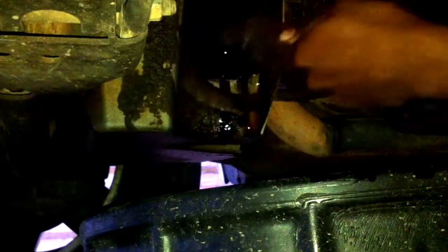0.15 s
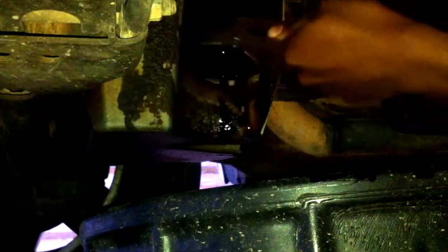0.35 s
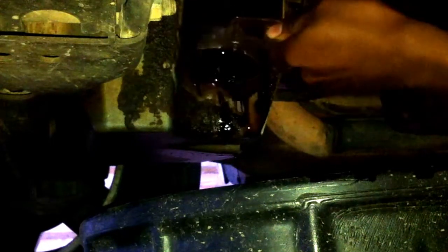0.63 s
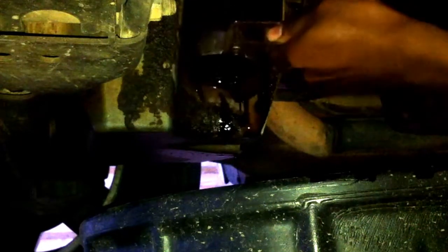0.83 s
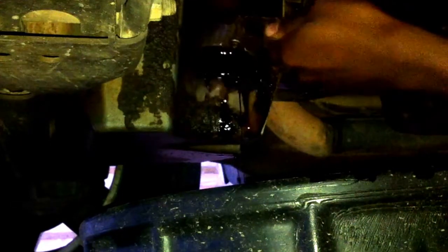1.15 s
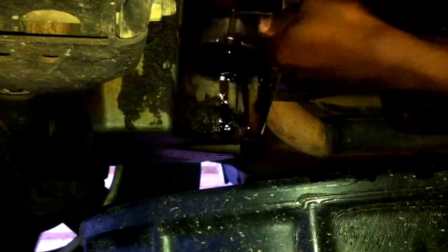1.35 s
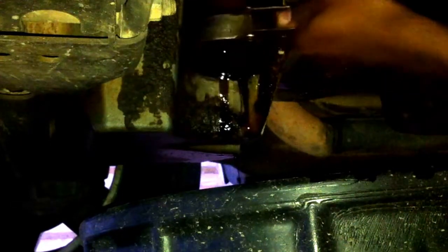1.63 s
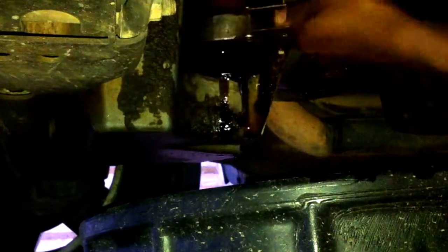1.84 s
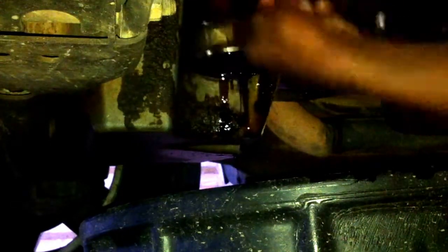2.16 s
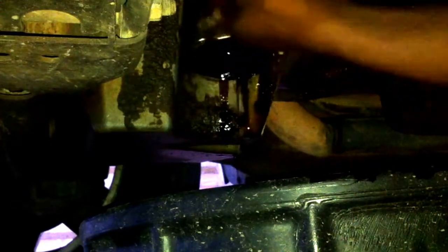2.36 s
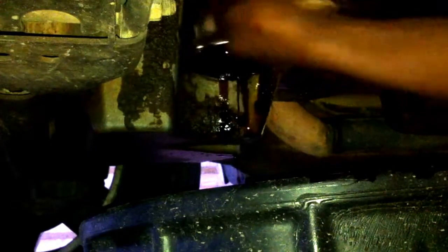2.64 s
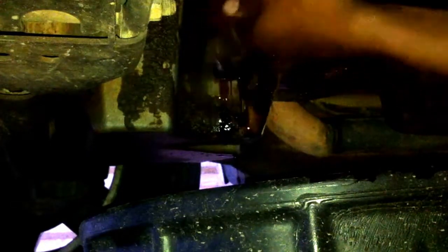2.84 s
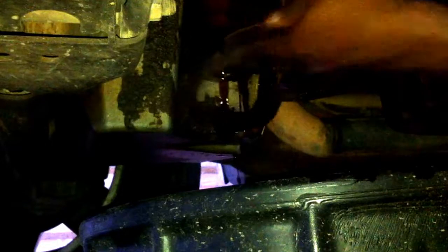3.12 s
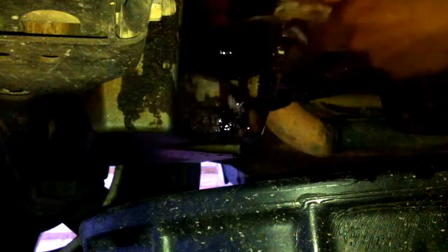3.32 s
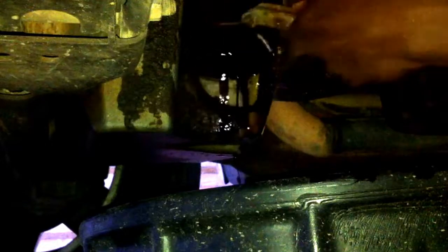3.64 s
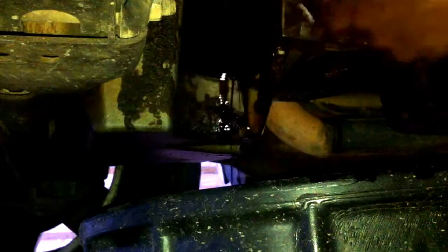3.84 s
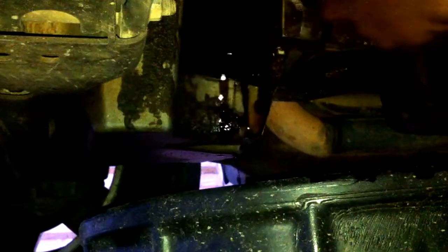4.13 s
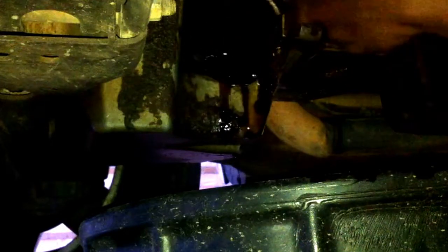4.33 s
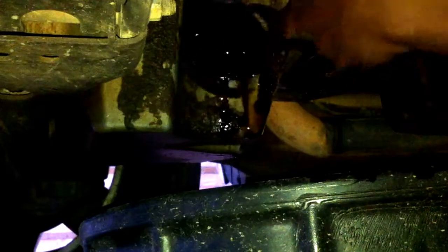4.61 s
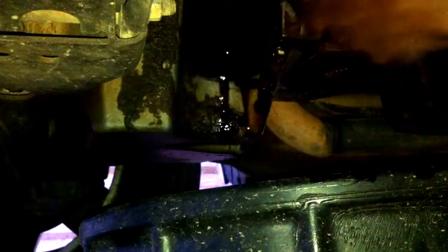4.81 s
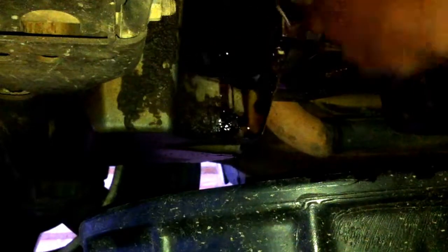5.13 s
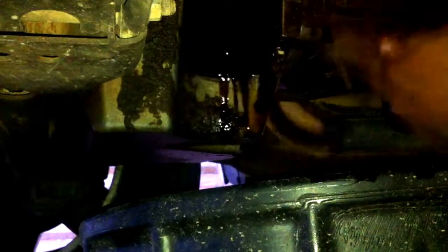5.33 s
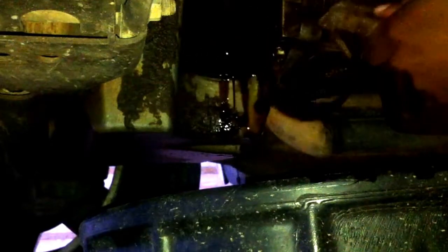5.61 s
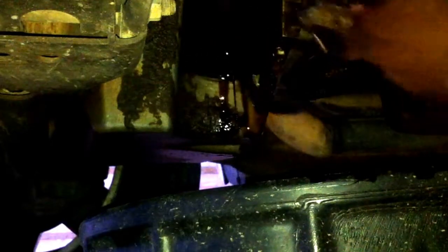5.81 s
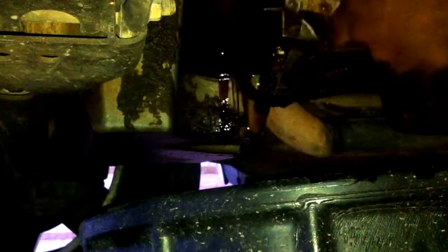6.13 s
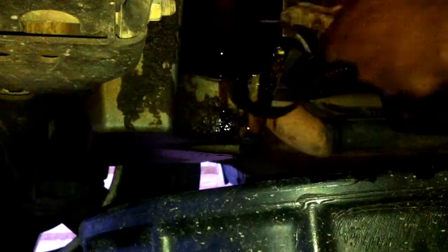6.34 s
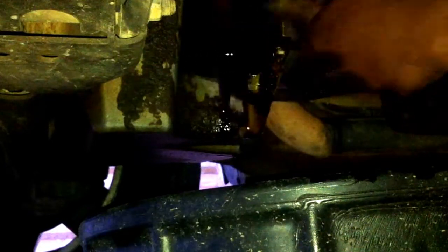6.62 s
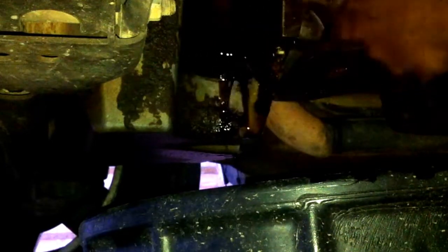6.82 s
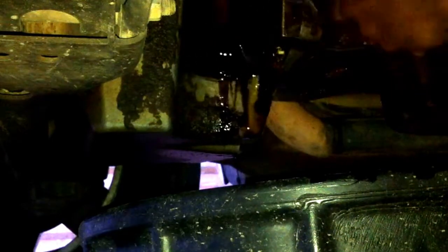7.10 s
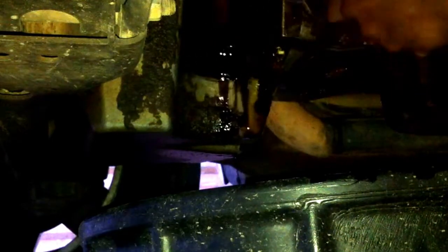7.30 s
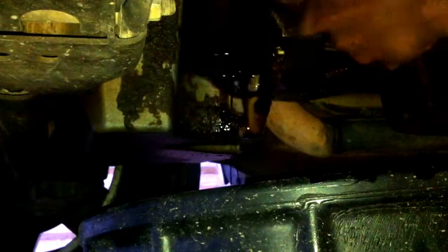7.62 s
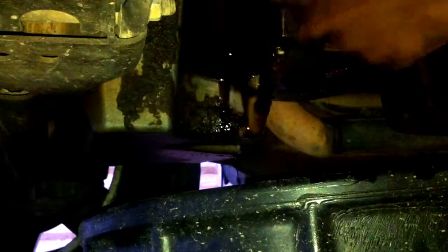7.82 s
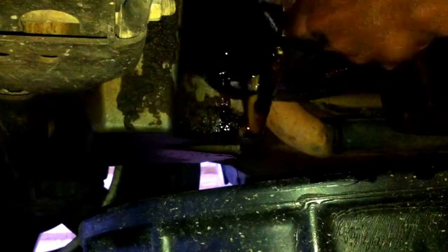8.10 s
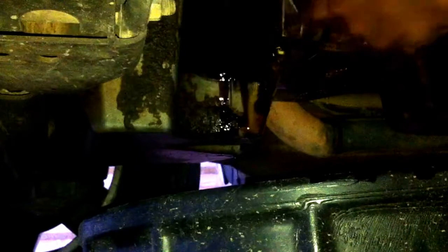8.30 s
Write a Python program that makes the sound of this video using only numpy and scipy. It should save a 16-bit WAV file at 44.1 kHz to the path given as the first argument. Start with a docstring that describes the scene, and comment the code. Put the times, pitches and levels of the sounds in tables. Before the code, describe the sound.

Oil patters and drums softly into a plastic pan while a filter clicks, with one dull bump over faint garage hum.

```python
"""Oil patters and drums softly in a plastic drain pan, over dull garage air and a thin high whine.
It runs off a loosened filter under a car: thick blobs make the pan floor boom, single drips tick on
its wall. A hand works at the filter, which clicks and rings its steel shell, and oily fingers slip.
After five seconds the arm brushes along the car's underside, bumps it once and squeaks faintly."""
import sys
import numpy as np
from scipy import signal
from scipy.fft import rfft, irfft, next_fast_len
from scipy.io import wavfile
from scipy.ndimage import map_coordinates

SR = 44100
rng = np.random.default_rng(int(sys.argv[2]) if len(sys.argv) > 2 else 0)


def unload_audio(sound):
    """Save the sound as a 16-bit wav file, at the path given as the first command line argument."""
    columns = np.transpose(np.atleast_2d(sound))
    # keep every value between -1 and 1, then stretch to whole-number steps
    steps = np.round(np.clip(columns, -1, 1) * 32767)
    wavfile.write(sys.argv[1], SR, steps.astype(np.int16))


N = 373086

# Levels are relative. A mode is a note a thing rings at; t60 is the time it takes to fade by 60 dB.
AIR_SPECTRUM = [(20, -16), (50, -26), (85, -15.5), (125, 2), (180, 5.5), (220, -6), (280, -1.5),
                (400, -5.5), (520, -5), (620, -5), (860, -6.5), (1020, -13), (1700, -17.5), (6000, -22),
                (9500, -21), (15500, -23.5)]  # the garage air: f/Hz, level/dB
AIR_DRIFT = [(0, -61), (.85, -65), (1.6, -64), (2.4, -63.5), (3.1, -65.5), (3.4, -67.5), (3.7, -65.5),
             (5, -64), (6.4, -61), (7.05, -64.5), (7.6, -62.5), (7.8, -72), (8.46, -62.5)]  # rise and fall of the air's dull part: t/s, level/dB
GARAGE_DECAY = [(150, 0.22), (400, .4), (800, 0.41), (2000, 0.12), (5500, 0.12), (12000, 0.048)]  # how long the garage echoes: f/Hz, t60/s
PAN_HUM_MODES = [(175.1, 18.5, -0.5), (557, 53, -28), (744, 8.6, -24), (906, 9.8, -12)]  # the pan under the thin stream: f/Hz, width/Hz, level/dB
# modes of the pan wall, in four groups from body to treble: f/Hz, width/Hz, level/dB
WALL_LOW_MODES = [(490, 173, 0.5), (715.6, 51, 5.5), (867, 60, 6)]
WALL_MID_MODES = [(1040, 200, -2.5), (1294, 265, 0.5), (1510, 100, -9.5)]
WALL_BRIGHT_MODES = [(1560, 320, -5.5), (1960, 94, 2), (2040, 170, -1), (2284, 26, -2.5)]
WALL_HIGH_MODES = [(2770, 420, -2), (3760, 140, 2.5), (4020, 32, 2), (4640, 340, -3)]
WALL_LINGERING_MODES = [(723, -19.5, 0.57), (1238, -21.5, 0.18)]  # wall modes that ring on: f/Hz, level/dB, t60/s
BIG_BLOBS = [(0.057, -50), (.183, -51), (0.228, -50.5), (0.428, -53.5), (0.601, -49), (.781, -43),
             (0.894, -48), (.964, -53.5), (1.084, -49.5), (1.274, -53.5), (1.376, -51), (1.679, -43),
             (1.795, -48), (2.045, -50.5), (2.155, -48), (2.222, -50.5), (2.291, -48.5), (2.458, -45),
             (2.63, -53), (2.809, -54.5), (3.059, -50), (3.164, -49), (3.244, -45.5), (3.752, -45.5),
             (4.056, -50.5), (4.245, -50.5), (4.464, -50.5), (4.582, -47), (4.924, -50), (5.556, -46),
             (5.762, -51), (6.159, -49.5), (6.236, -49), (6.686, -52), (6.724, -49), (6.762, -46.5),
             (7.183, -50), (7.372, -47), (7.493, -49.5), (8.118, -50.5)]  # oil landing on the pan floor: t/s, level/dB
PAN_FLOOR_MODES = [(256, -22, 0.23), (512, -16.5, 0.16), (700, -29, 0.29), (872, -29, 0.17)]  # the floor's upper modes: f/Hz, level/dB, t60/s
WALL_DRIPS = [(0.0806, -34, 0, -3.5), (3.504, -35, 0.07, -2), (3.547, -43, 0.4, -4),
              (4.0174, -30.5, 0.17, -3), (4.222, -53, 0.68, 0), (4.995, -49, 0.44, -4), (5.353, -43, 1, -8),
              (5.632, -49, 0.77, -10), (5.801, -49.5, 0.54, -7), (6.209, -40.5, 0, 3.5),
              (6.463, -50.5, 0, -1), (6.496, -45.5, 0.66, -1), (6.913, -35.5, 0.33, 3.5),
              (7.517, -42, 0.43, -5), (7.648, -43, 0.59, -4), (7.99, -55, .6, -6), (8.145, -50, .65, -1)]  # drips on the pan wall: t/s, level/dB, softness (0-1), brightness/dB
FILTER_CLICKS = [(1.033, -54, 3.5, -12, 0.028), (1.182, -47.5, -1, -27, .027),
                 (1.4333, -41, -12, -36, 0.089), (1.6063, -38, -1.5, -8.5, 0.064),
                 (2.045, -41.5, -7, -33, 0.035), (2.9354, -39.5, -24, -35, 0.058),
                 (5.323, -49, -15, -25, 0.069), (5.4132, -42, -16, -29, .03), (5.463, -37, -2.5, -30, 0.01),
                 (5.62, -46.5, -7, -20, 0.051), (5.865, -42, -19, -23, 0.015), (5.922, -48, 4, -9, 0.035),
                 (6.0219, -37.5, 2, -14, .03), (6.0506, -31, -13, -11, 0.074), (8.433, -51, 9, -25, 0.038)]  # the filter catching: t/s, level/dB, body/dB, ring/dB, t60/s
EDGE_SPECTRUM = [(2500, -8.5), (4300, -5), (5500, -12), (6700, -14), (8300, -5.5), (9600, 3.5), (10500, -5),
                 (12000, -3.5), (13200, -14), (15500, -16)]  # a click's sharp part: f/Hz, level/dB
BODY_SPECTRUM = [(100, -45), (250, -8), (700, 5), (2100, -7), (3000, -9), (4600, -4.5), (5800, -8),
                 (9000, -26)]  # a click's lower part: f/Hz, level/dB
SHELL_MODES = [(2000, 19, 6), (2380, 28, 1), (2530, 13, -0.5), (2833, 59, -1.5), (3020, 35, -10),
               (3910, 41, -6), (4310, 78, -3), (4550, 24, -10)]  # the filter's steel shell: f/Hz, width/Hz, level/dB
FINGER_SLIPS = [(1.214, 0.053, -66), (1.35, 0.09, -64), (2.085, .13, -64), (2.273, 0.058, -64),
                (2.399, 0.043, -62), (2.56, 0.088, -68), (2.867, .08, -61.5), (3.13, .015, -66.5),
                (3.775, .02, -64.5), (4.68, .025, -66), (7.078, 0.074, -68.5), (7.3, .02, -71)]  # fingers sliding on the filter: t/s, length/s, level/dB
OILY_SPECTRUM = [(590, -46), (1000, -2), (1300, -5), (1680, -6.5), (3330, -7.5), (3650, -3), (6260, -13),
                 (9470, -2), (12500, -12), (15500, -18.5)]  # oily slips and wet ticks: f/Hz, level/dB
ARM_STROKES = [(5.036, .17, 0.11, -46, -61), (5.193, 0.2, 0.026, -53.5, -61.5),
               (5.345, 0.044, .012, -46.5, -56), (5.395, 0.069, 0.025, -50.5, -56.5),
               (5.49, 0.15, 0.053, -60, -61), (5.64, 0.25, 0.033, -63, -66), (5.898, .13, 0.12, -45, -50.5),
               (6.043, 0.014, .008, -49, -48.5), (6.069, 0.18, .03, -62, -63),
               (6.312, 0.037, .02, -63, -58.5)]  # the arm brushing past: t/s, length/s, rise/s, rub/dB, hiss/dB
RUB_SPECTRUM = [(70, -43), (130, -11), (230, -10.5), (400, -11), (740, -5), (950, -5.5), (1300, -6.5),
                (1700, -10.5), (2200, -15), (2800, -44), (4000, -36.5)]  # a stroke's dull part: f/Hz, level/dB
HISS_SPECTRUM = [(70, -27), (200, -5), (1500, -8), (2500, 3), (2950, -1), (4100, -3.5), (5300, -7),
                 (6600, -18.5), (8300, -11), (9650, -2.5), (10400, -7), (12000, -7), (13100, -16),
                 (15500, -23)]  # a stroke's bright part: f/Hz, level/dB
BUMP_HITS = [(5.4133, -17), (5.4251, -27.5), (5.4403, -29.5), (5.462, -31.5), (5.4771, -40)]  # the arm's blow and its rebounds: t/s, level/dB
PANEL_MODES = [(144, 0, 0.1), (247.5, 6, 0.055), (275, 0, 0.05), (385, -1.5, 0.062), (515, 10.5, 0.016),
               (731, -29, 0.25), (820, 2.5, 0.021), (1318, -15.5, 0.047)]  # a panel under the car: f/Hz, level/dB, t60/s
SQUEAK_LEVELS = [(5.62, -78), (5.7, -67), (5.8, -68), (5.87, -79)]  # skin dragging on metal: t/s, level/dB
SQUEAK_MODES = [(3500, 250, 0)]  # the squeak's pitch: f/Hz, width/Hz, level/dB


def amp(db):
    """Turn decibels into a gain."""
    return 10 ** (np.asarray(db) / 20)


def unit(x):
    """Scale x to an average (rms) size of 1."""
    return x / np.sqrt(np.mean(x ** 2) + 1e-20)


def peak_one(x):
    """Scale x to a peak of 1."""
    return x / (np.abs(x).max() + 1e-20)


def along(points, hz):
    """Read a curve of (f/Hz, value) points at hz, on a log frequency axis."""
    f, values = np.transpose(points)
    return np.interp(np.log(hz + 1), np.log(f + 1), values)


def wobble(rate):
    """A smooth curve through rate random points a second."""
    return map_coordinates(rng.standard_normal(int(N * rate / SR) + 4), [np.arange(N) * rate / SR])


def filtered(x, response):
    """Multiply each frequency in x by response(hz)."""
    size = next_fast_len(len(x) + SR // 4)
    return irfft(rfft(x, size) * response(np.fft.rfftfreq(size, 1 / SR)), size)[:len(x)]


def band(x, low_hz, high_hz):
    """Keep the part of x between two frequencies."""
    return signal.sosfilt(signal.butter(4, [low_hz, high_hz], "bandpass", fs=SR, output="sos"), x)


def colour(x, spectrum):
    """Shape x with a spectrum, at rms 1."""
    return unit(filtered(x, lambda hz: amp(along(spectrum, hz))))


def resonate(x, modes, low_hz, high_hz):
    """Let x shake modes within a band, at rms 1; neighbours swing opposite ways."""
    def response(f):
        return sum((-1) ** k * amp(db) * 1j * f * width / (hz * hz - f * f + 1j * f * width)
                   for k, (hz, width, db) in enumerate(modes))
    return unit(band(filtered(x, response), low_hz, high_hz))


def ring(modes, t, scatter_db):
    """Struck modes fade away; scatter_db varies their strengths at random."""
    return sum(amp(db + scatter_db * rng.normal() - 60 * t / t60) * np.sin(2 * np.pi * hz * t)
               for hz, db, t60 in modes)


def add(track, start, x):
    """Mix x into track from start, in seconds."""
    part = track[max(round(start * SR), 0):][:len(x)]
    part += x[:len(part)]


def room(x, near_db, near_t60, far_db):
    """Add quick echoes between ground and car, and the garage's longer echo."""
    hz, t, noise = signal.stft(rng.standard_normal(SR // 2), SR, nperseg=256)
    far = signal.istft(noise * amp(-60 * t / along(GARAGE_DECAY, hz)[:, None]), SR, nperseg=256)[1]
    t = np.arange(len(far)) / SR
    near = rng.standard_normal(len(t)) * amp(-60 * t / near_t60)
    fade_in = 1 - np.exp(-(t / 0.00033) ** 2)
    echo = amp(near_db) * near / np.linalg.norm(near) + amp(far_db) * far / np.linalg.norm(far)
    return x + signal.fftconvolve(x, fade_in * echo)[:len(x)]


def stroke(start, length, rise, t60):
    """The gain of one sliding touch: it builds up, holds and dies away."""
    t = np.arange(N) / SR - start
    build_up = np.sin(np.pi / 2 * np.clip(t / rise, 0, 1)) ** 2
    return build_up * amp(-60 * np.clip((t - length) / t60, 0, 2))


def friction(spectrum, grain_db, grain_rate):
    """Sliding makes noise in clumps of tiny slips."""
    return colour(rng.standard_normal(N) * amp(grain_db * wobble(grain_rate)), spectrum)


def garage_air(dull_below_hz=1800, whine_hz=15000):
    """Dull air drifts in level under an even hiss and a thin electronic whine."""
    t = np.arange(N) / SR
    air = amp(-64) * colour(rng.standard_normal(N), AIR_SPECTRUM)
    dull = filtered(air, lambda hz: 1 / (1 + (hz / dull_below_hz) ** 4))
    times, db = np.transpose(AIR_DRIFT)
    drift = amp(np.interp(t, times, np.minimum(db - np.median(db), 3)))
    whine = amp(-84) * np.sin(2 * np.pi * whine_hz * t)
    return air + (drift - 1) * dull + whine


def oil_stream(drops_per_s=130, ticks_per_s=22):
    """The thin stream's tiny drops keep the pan humming; some also patter."""
    chance, size = rng.random(N), rng.standard_normal(N)
    drops = (chance < drops_per_s / SR) * size
    hum = resonate(drops, PAN_HUM_MODES, 93, 1400)
    ticks = (chance < ticks_per_s / SR) * np.tanh(size)
    wall = resonate(ticks, WALL_LOW_MODES + WALL_MID_MODES, 394, 1900)
    patter = unit(room(wall, near_db=8.5, near_t60=0.12, far_db=1.5))
    return amp(-65.5) * hum + amp(-73.5) * patter


def small_blobs(gap_s=0.13, level_db=-60.5):
    """Small blobs fall unevenly between the big ones: rows of t/s, level/dB."""
    edges = [start for start, _ in BIG_BLOBS] + [N / SR]
    chance = rng.standard_normal((len(edges), 8, 2))
    rows = []
    for start, end, draws in zip(edges, edges[1:], chance):
        steps = max(round((end - start) / gap_s), 1)
        times = np.linspace(start, end, steps + 1)[1:-1]
        rows += [(s + 0.015 * late, level_db + 0.5 * size) for s, (late, size) in zip(times, draws)]
    return rows


def oil_blobs(lowest_hz=172.6, scatter_hz=4.3):
    """Thick oil lands softly, so the pan floor's lowest mode swells up and booms."""
    out, t = np.zeros(N), np.arange(SR // 3) / SR
    swell = 1 - np.exp(-(t / 0.0081) ** 2)
    for start, db in list(BIG_BLOBS) + small_blobs():
        hz = lowest_hz + scatter_hz * rng.normal()  # shifts with where the blob lands
        boom = ring([(hz, 0, 0.14)] + PAN_FLOOR_MODES, t, scatter_db=3.5)
        add(out, start - 0.002, amp(db) * peak_one(swell * boom))
    return out


def oil_drips():
    """Drips snap the pan wall and splash; hard ones sound higher, soft ones lower."""
    out, t = np.zeros(N), np.arange(SR // 2) / SR
    snap = signal.unit_impulse(len(t))
    low, mid, bright = (resonate(snap, modes, 198, 2020)
                        for modes in (WALL_LOW_MODES, WALL_MID_MODES, WALL_BRIGHT_MODES))
    high = resonate(snap, WALL_HIGH_MODES, 1400, 8400)
    for start, db, softness, bright_db in WALL_DRIPS:
        body_db = -9 + 30.5 * softness
        treble_db = -10 - 12 * softness
        hit = peak_one(mid + amp(body_db) * low + amp(bright_db) * bright + amp(treble_db) * high)
        splash = room(hit, near_db=-3 + 12 * softness, near_t60=0.094, far_db=-5.5)
        weight = min(amp(0.5 * body_db), 1)  # a light drip rings the wall less
        linger = ring(WALL_LINGERING_MODES, t, scatter_db=1.5)
        add(out, start, amp(db) * (splash + weight * linger))
    return out


def oil_film(breaks_per_s=5):
    """The oil film breaks now and then in faint wet ticks."""
    breaks = (rng.random(N) < breaks_per_s / SR) * np.tanh(rng.standard_normal(N))
    ticks = room(breaks, near_db=27, near_t60=0.081, far_db=-12)
    return amp(-84) * colour(ticks, OILY_SPECTRUM)


def filter_clicks(rise_s=0.0008):
    """The filter catches and slips: a short gritty burst that rings its steel shell."""
    out, t = np.zeros(N), np.arange(SR // 4) / SR
    attack = 1 - np.exp(-t / rise_s)
    for start, db, body_db, ring_db, t60 in FILTER_CLICKS:
        edge = colour(rng.standard_normal(len(t)), EDGE_SPECTRUM) * amp(-60 * t / t60)
        body = colour(rng.standard_normal(len(t)), BODY_SPECTRUM) * amp(-60 * t / (2 * t60))
        shell = resonate(rng.standard_normal(len(t)), SHELL_MODES, 1800, 4100) * amp(-60 * t / 0.15)
        burst = attack * (edge + amp(body_db - 0.5) * body + amp(ring_db + 6) * shell)
        add(out, start, amp(db - 9.5) * room(burst, near_db=-41, near_t60=0.076, far_db=-4.5))
    return out


def finger_slips():
    """Fingers slip on the oily filter in short, quiet rubs."""
    sliding = sum(amp(db) * stroke(start, length, rise=0.013, t60=0.11)
                  for start, length, db in FINGER_SLIPS)
    return amp(-3) * sliding * friction(OILY_SPECTRUM, grain_db=2, grain_rate=110)


def arm_brush():
    """The arm rubs and hisses along the car's underside; each stroke fades as it slows."""
    strokes = np.array([stroke(start, length, rise, t60=0.23)
                        for start, length, rise, _, _ in ARM_STROKES])
    levels = amp(np.transpose(ARM_STROKES)[-2:])
    rub_gain, hiss_gain = np.sqrt(levels ** 2 @ strokes ** 2)  # overlapping strokes add in power
    rub = amp(-0.5) * rub_gain * friction(RUB_SPECTRUM, grain_db=1.5, grain_rate=160)
    hiss = amp(-2) * hiss_gain * friction(HISS_SPECTRUM, grain_db=1, grain_rate=590)
    flicker = amp(0.87 * wobble(41))
    return rub + hiss * flicker


def arm_bump():
    """A soft blow rebounds a few times on a damped panel that gives off no deep bass."""
    out, t = np.zeros(N), np.arange(SR // 2) / SR
    panel = ring(PANEL_MODES, t, scatter_db=0)
    attack = 1 - np.exp(-t / 0.0049)
    thud = peak_one(band(panel * attack, 148, 2300))
    for start, db in BUMP_HITS:
        add(out, start, amp(db) * thud)
    return room(out, near_db=-39, near_t60=0.071, far_db=-20.5)


def skin_squeak():
    """Skin drags on metal with a faint, breathy squeak."""
    times, db = np.transpose(SQUEAK_LEVELS)
    drag = amp(np.interp(np.arange(N) / SR, times, db, left=-np.inf, right=-np.inf))
    return drag * resonate(rng.standard_normal(N), SQUEAK_MODES, 3000, 5700)


def scene():
    """Everything heard from under the car, in one channel."""
    oil = oil_blobs() + oil_stream() + oil_film() + oil_drips()
    work = filter_clicks() + arm_bump() + finger_slips() + arm_brush() + skin_squeak()
    return (oil + work + garage_air())[None]


def record(dry):
    """Cut away the very highest treble."""
    return np.array([filtered(channel, lambda hz: hz < 15830) for channel in dry])


dry = scene()
out = record(dry)
unload_audio(out)
```